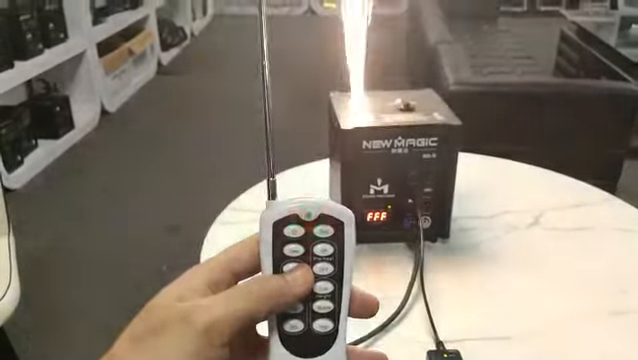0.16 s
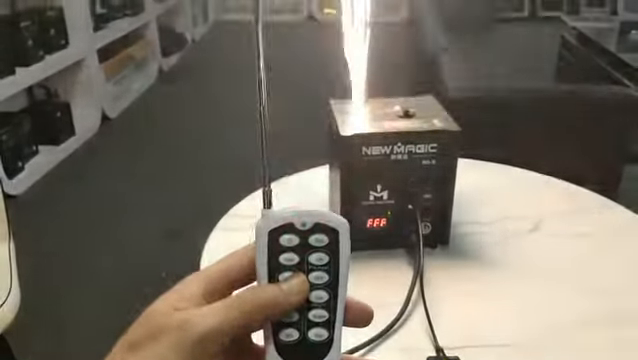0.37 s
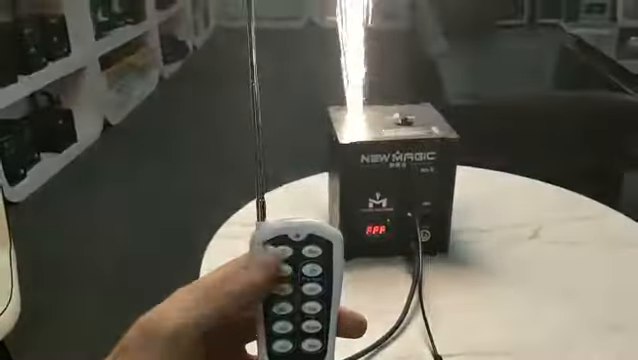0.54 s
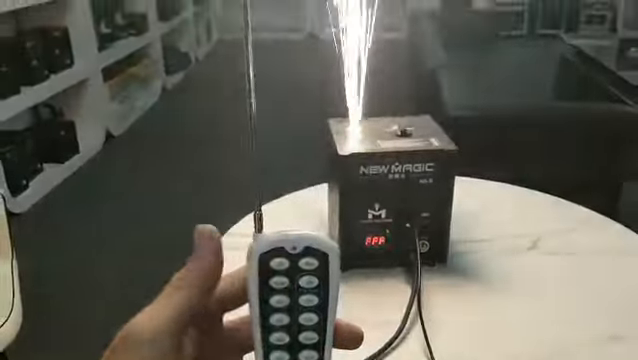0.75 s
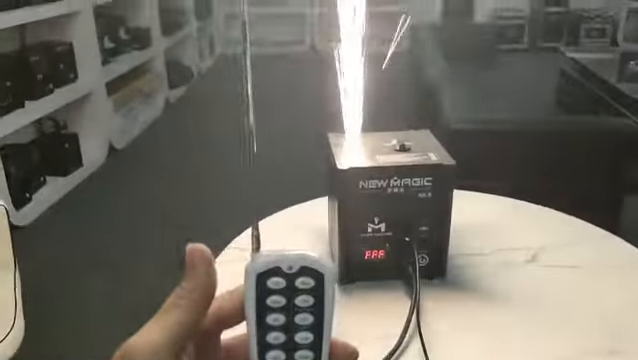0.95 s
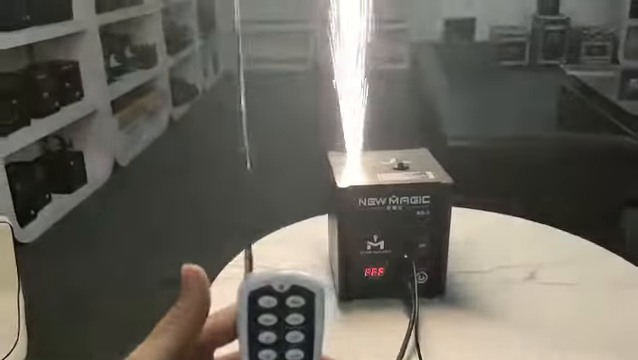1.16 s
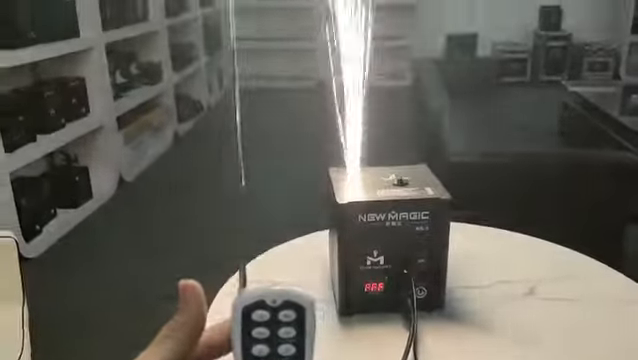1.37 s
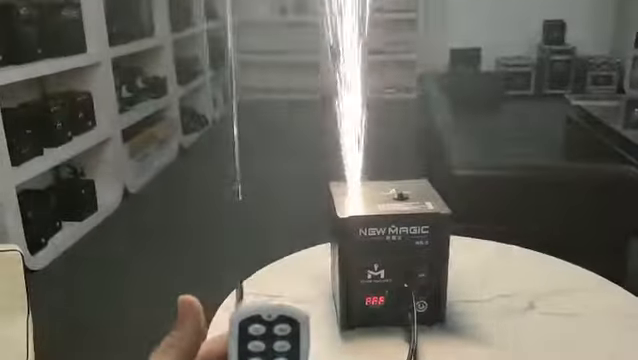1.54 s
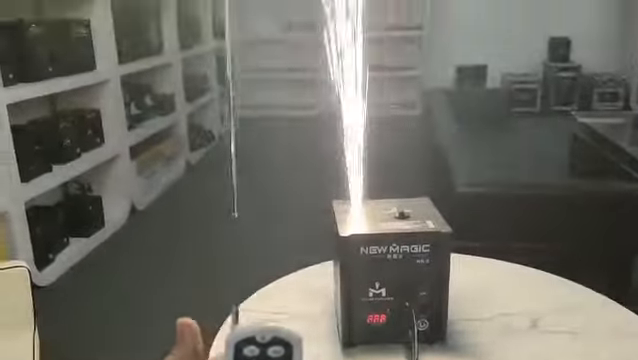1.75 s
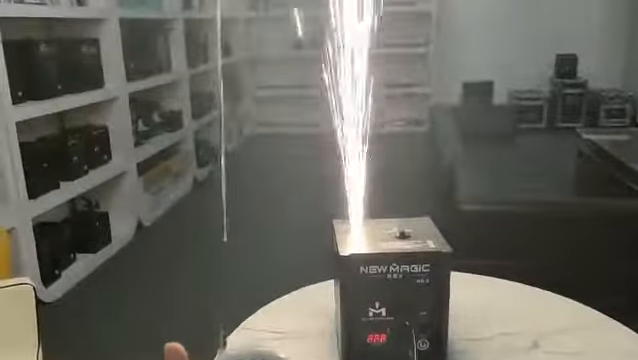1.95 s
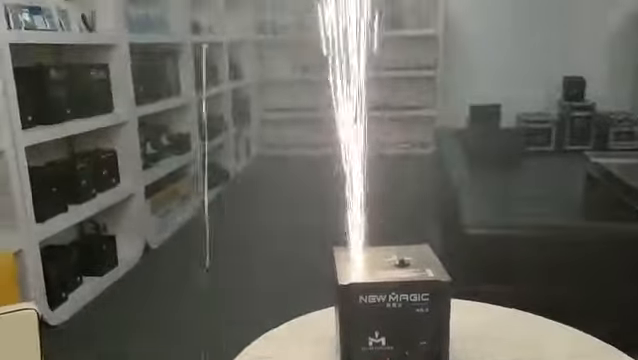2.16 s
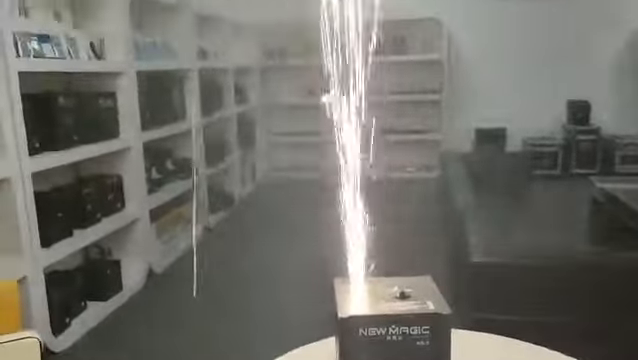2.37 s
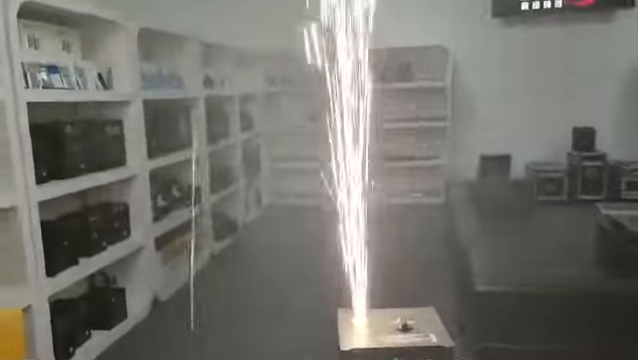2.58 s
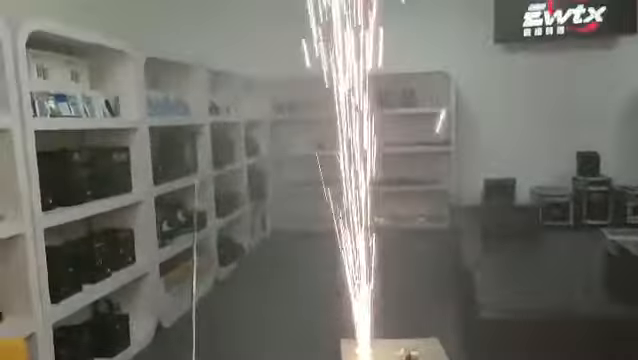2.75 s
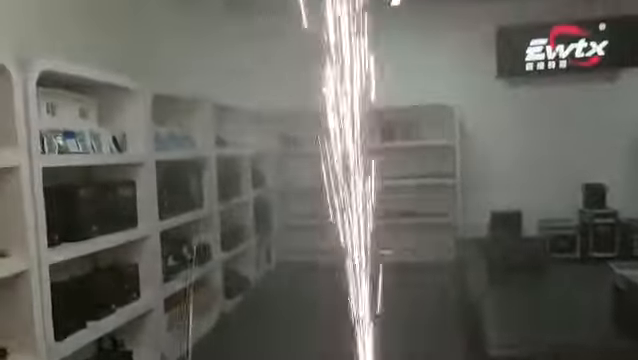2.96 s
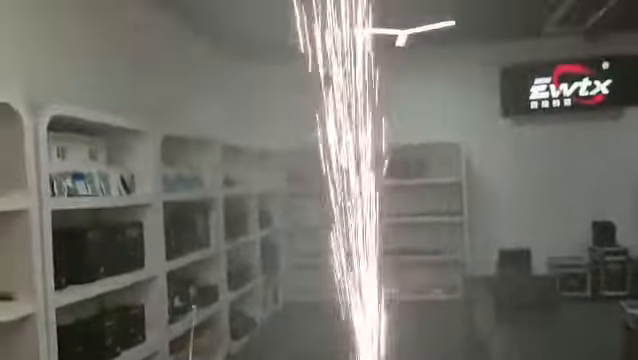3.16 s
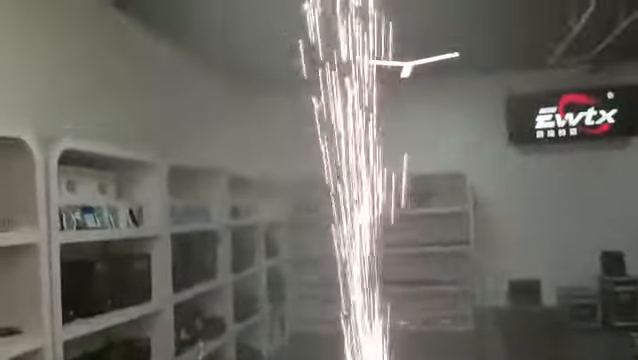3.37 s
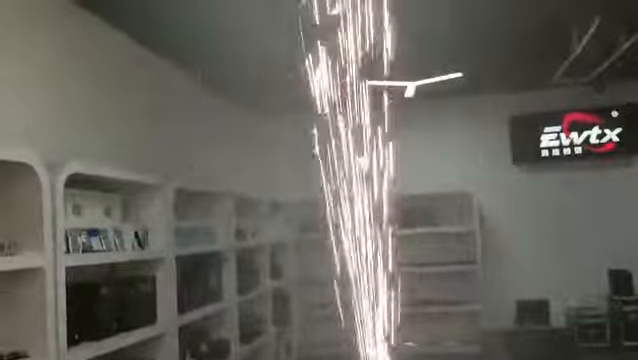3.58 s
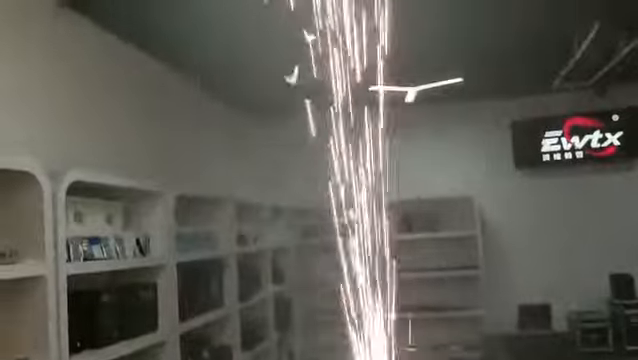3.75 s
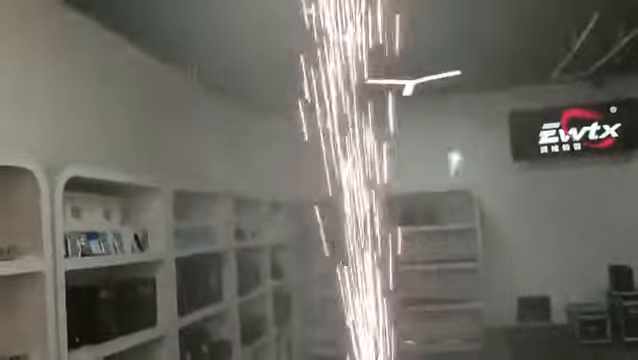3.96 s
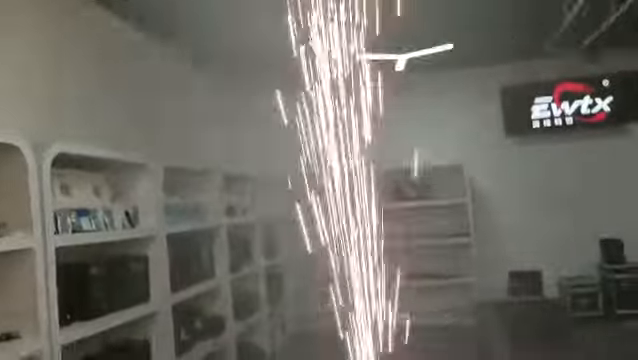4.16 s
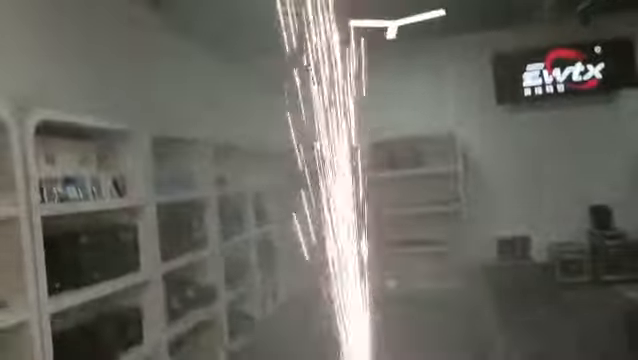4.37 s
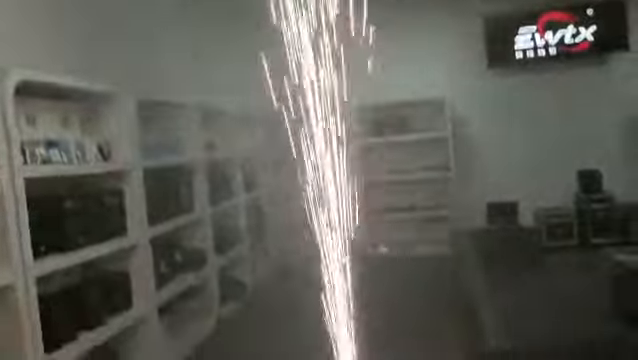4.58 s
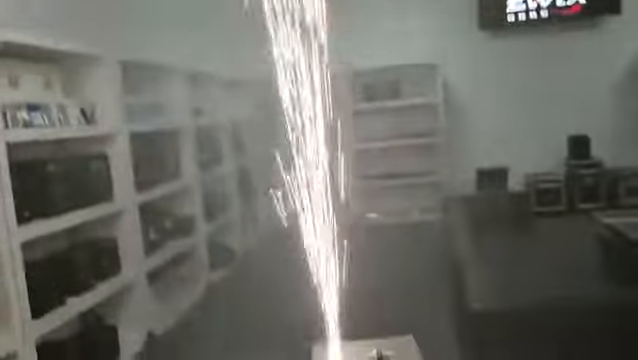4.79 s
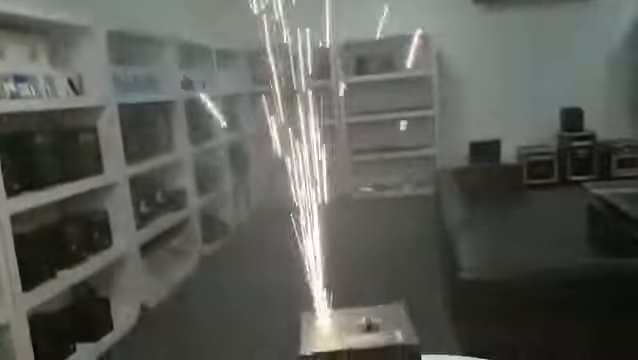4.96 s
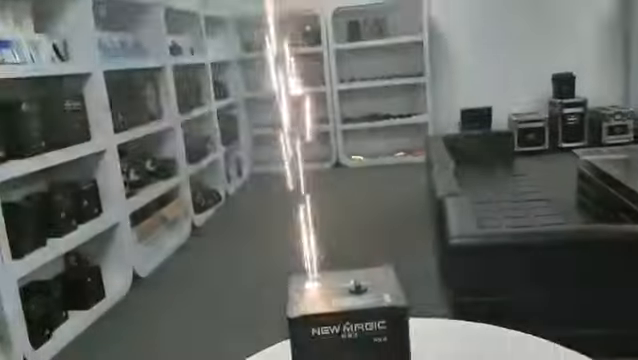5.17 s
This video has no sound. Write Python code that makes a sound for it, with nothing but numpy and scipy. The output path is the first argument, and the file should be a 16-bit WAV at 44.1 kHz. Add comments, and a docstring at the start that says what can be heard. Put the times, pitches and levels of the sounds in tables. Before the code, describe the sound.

A spark fountain machine rushes and hisses over a whining blower, then switches off and dies away with a falling airy whistle.

```python
"""A cold-spark fountain rushes on a showroom table: air roars through its duct and burning powder
fizzes and spits. Its blower hums and whines at multiples of the shaft speed, and air rings the nozzle.
The tones swell and fade as a hand-held phone, about a metre away, rises beside the fountain.
At 4.6 s the blower is switched off, and the rush dies away with a falling airy whistle
over the low rumble of the room."""
import sys
import numpy as np
from scipy import signal
from scipy.fft import rfft, irfft
from scipy.io import wavfile
from scipy.ndimage import map_coordinates

SR = 44100
rng = np.random.default_rng(int(sys.argv[2]) if len(sys.argv) > 2 else 0)


def to_wav(s):
    """Save 16-bit WAV."""
    ch = np.atleast_2d(s).T  # columns
    pcm = np.round(np.clip(ch, -1, 1) * 32767)  # PCM
    wavfile.write(sys.argv[1], SR, pcm.astype(np.int16))


N = 230334
TIME = np.arange(N) / SR
FREQ = np.maximum(np.arange(N // 2 + 1) * SR / N, 1)
SIDES = np.array([[1], [-1]])  # left, right
OFF_S = 4.574  # the blower is switched off
TOP_HZ = 7550  # the phone cuts sound above this


# Bigger lumps of powder flare up. Columns: middle_s, length_s, lift_db
FLARES = [(0.24, 0.025, 3), (0.408, 0.17, 2), (0.843, 0.054, 1), (2.15, 0.051, 2.5), (2.942, 0.089, 2),
          (3.354, 0.11, 1)]

def fountain(sputter_db=0.42, sputter_hz=11):
    """Rushing air roars; burning powder hisses, sputtering and flaring as it is fed unevenly."""
    height = phone_height()
    roar, hiss = np.sqrt(1 - height) * airstream(0) + np.sqrt(height) * airstream(1)
    roar = shimmer(roar, depth=.33, longest_s=.009)
    hiss = flicker(shimmer(hiss, depth=.45, longest_s=.007))
    feed_db = sputter_db * walk(sputter_hz)
    feed_db += sum(db * bump(at_s, length_s) for at_s, length_s, db in FLARES)
    hiss_gain = flow(facing_db=-25, raised_db=-24.5, fall_db_per_s=37.3) * undb(feed_db)
    return lingering(coasting(roar)) + coasting(hiss) * hiss_gain


# The overall tone of the rush. Columns: pitch_hz, relative_level_db
RUSH_COLOUR = [(120, -23), (190, -2), (260, -4), (450, -7), (520, -7), (700, -3), (1020, -3.5), (1450, 0.5),
               (1680, 0), (2300, -3.5), (4100, -2.5), (4900, -5), (6300, -8), (7200, -8.5), (7500, -20)]
# Pitches boosted by the case, duct and nozzle, with the phone facing the case or raised.
# Columns: pitch_hz, width_hz, facing_lift_db, raised_lift_db
DUCT_PEAKS = [(315, 32, 2, 5.5), (354, 130, 2.5, -1), (417, 82, 3.5, 8.5), (704.4, 13, 5, 7.5),
              (752, 28, 4, 0), (859, 65, 4, 1), (1127, 110, 5.5, 6.5), (1202, 35, 0, 3.5), (1335, 55, 3, 7),
              (1650, 21, -4, -1), (2170, 26, 4, 0), (2520, 570, 4, 4.5), (3460, 150, 3.5, 3),
              (3820, 110, 4.5, 2.5), (5130, 120, 1, 0.5)]
# Pitches where echoes off the table and case mostly weaken the rush (below 0 is a dip).
# Columns: pitch_hz, width_hz, facing_lift_db, raised_lift_db
ECHO_DIPS = [(506, 73, -2.5, 2.5), (1003, 73, -0.5, -1), (1480, 51, -3, -2.5), (1655, 65, -5, -3.5),
             (1900, 110, -3.5, -4.5), (2100, 71, -3.5, 1.5), (2333, 97, -4, -6), (4160, 140, -0.5, -1.5),
             (4760, 270, -2.5, 0)]

def airstream(height, split_hz=2100, spark_db=-8):
    """Swirling air in the duct, heard from height 0 or 1: a low roar and a high hiss with sparks in it."""
    lift_db = lift_of(DUCT_PEAKS, height) + lift_of(ECHO_DIPS, height)
    colour = undb(over_freq(RUSH_COLOUR) + lift_db) * reflections() * (FREQ < TOP_HZ)
    treble = 1 / (1 + (split_hz / FREQ) ** 6)
    roar = stereo_noise(height) * colour * np.sqrt(1 - treble)
    hiss = (stereo_noise(height) + undb(spark_db) * sparks()) * colour * np.sqrt(treble)
    return np.array([unit(irfft(roar, N)), unit(irfft(hiss, N))])


def sparks(per_second=2500, spread_db=3):
    """Burning grains make tiny pops of uneven size; gives a left and a right spectrum."""
    lit = rng.random((2, N)) < per_second / SR
    size = undb(spread_db * np.minimum(rng.exponential(size=(2, N)), 4))
    return rfft(unit(lit * size * rng.choice([-1, 1], (2, N))))


def reflections(count=6, strength=.07, shortest_s=.003, longest_s=.011, above_hz=1700):
    """Short echoes off the table, case and shelves colour the treble differently on each side."""
    delays_s = rng.uniform(shortest_s, longest_s, (count, 2, 1))
    echoes = sum(np.exp(-2j * np.pi * FREQ * delay) for delay in delays_s)
    return 1 + strength * echoes * FREQ ** 2 / (FREQ ** 2 + above_hz ** 2)


def shimmer(pair, depth, longest_s, change_hz=12, count=16):
    """The rush has a shifting, watery, metallic sheen."""
    lags = np.linspace(longest_s / count, longest_s, count) * rng.uniform(.9, 1.1, count) * SR
    sheen = sum(walk(change_hz) * np.roll(pair, int(lag), axis=1) for lag in lags)
    return unit(pair + depth * sheen / np.sqrt(count))


def flicker(pair, depth_db=3.5, rate_hz=22):
    """The upper treble flickers band by band."""
    centres_hz = np.linspace(2900, TOP_HZ, 11)
    spectrum = rfft(pair)
    masks = [np.interp(FREQ, centres_hz, row) for row in np.eye(len(centres_hz))]
    steady, *bands = [irfft(spectrum * mask, N) for mask in masks]
    flickering = sum(band * unit(undb(depth_db * np.minimum(walk(rate_hz), 1))) for band in bands)
    return unit(steady + flickering)


def coasting(pair, sag_per_s=0.13):
    """A rush slows down, and so sinks in pitch, once the blower has lost power."""
    place = np.cumsum(1 - sag_per_s * since_off()) - 1
    return np.array([map_coordinates(side, [place], mode="mirror") for side in pair])


def lingering(roar, bass_hz=450, facing_db=-24, raised_db=-23.5):
    """The roar dies away after switch-off; the room holds on to its bass for longer."""
    bass = irfft(rfft(roar) / (1 + (FREQ / bass_hz) ** 10), N)
    upper = (roar - bass) * flow(facing_db, raised_db, fall_db_per_s=28.4)
    return upper + bass * flow(facing_db, raised_db, fall_db_per_s=16.5)


def flow(facing_db, raised_db, fall_db_per_s):
    """Loudness of a rush: held while the blower runs, falling evenly after switch-off."""
    return undb(by_height(facing_db, raised_db) - fall_db_per_s * since_off())


# How fast the blower shaft turns once up to speed. Columns: time_s, speed_hz
SHAFT_SPEED = [(0.3, 224.1), (0.68, 224.7), (0.92, 222.9), (2.05, 222.9), (2.3, 221.4), (2.7, 222.4),
               (3.05, 224.9), (3.8, 225.2), (4.55, 225.1)]
# The tones of the whine, each a multiple of the shaft speed.
# Columns: multiple, facing_level_db, raised_level_db, left_minus_right_db, left_lead_rad
WHINE_TONES = [(3, -45.5, -48, 3.5, 0.5), (4, -34.5, -38.5, -3.5, -0.15), (5, -39.5, -41.5, 1, 3.5),
               (6, -51, -47, -2.5, -2.5), (7, -34, -36.5, 0.5, -1.25), (8, -33.5, -35.5, 3, 1.25),
               (9, -36.5, -37.5, 5, -1.2), (10, -38, -39.5, 11, -0.1), (11, -44.5, -44, 2.5, 3),
               (12, -42.5, -41, 10, 0.5), (16, -60, -45, 4.5, -3), (20, -45, -42, 5.5, -0.1)]

def blower(wobble=0.00063, wobble_hz=20, waver_db=1, waver_hz=13):
    """The unbalanced fan hums once a turn; its blades whine higher up until the power is cut."""
    start_short_hz, start_short_db, settle_s = 5.9, 8, .13  # it is still coming up to speed
    hum_hold_s, hum_fade_s, whine_fade_s = .022, .026, .12  # after switch-off
    starting = np.exp(-TIME / settle_s)
    shaft_hz = (curves(SHAFT_SPEED)[0] - start_short_hz * starting) * (1 + wobble * walk(wobble_hz))
    phase = 2 * np.pi * np.cumsum(shaft_hz) / SR
    hum_db = by_height(-27, -32) + standing_waves(multiple=1)[0]
    hum = unit(np.sin(phase)) * undb(hum_db)
    whine = 0
    for multiple, facing_db, raised_db, pan_db, lead_rad in WHINE_TONES:
        lift_db, left_db = standing_waves(multiple)
        level_db = by_height(facing_db, raised_db) + lift_db + waver_db * walk(waver_hz)
        whine += whine_tone(phase, multiple, pan_db + left_db, lead_rad) * undb(level_db)
    hum *= np.exp(-np.maximum(since_off() - hum_hold_s, 0) / hum_fade_s)
    whine *= np.exp(-since_off() / whine_fade_s)
    return (hum + whine) * undb(-start_short_db * starting)


def whine_tone(phase, multiple, pan_db, lead_rad, flutter_hz=16):
    """One blade tone: echoes toss it between the moving microphones and swirling air shakes it."""
    # higher tones are scattered more and change faster as the phone moves
    scatter, drift_hz = multiple / 60, 1.2 * np.sqrt(multiple)
    path = (1 + scatter * swirl(drift_hz)) * undb(SIDES * pan_db / 2)
    path /= np.sqrt(np.mean(np.abs(path) ** 2, axis=0))  # what one side loses, the other gains
    side_phase = SIDES * (lead_rad + by_height(0.18, 1) * walk(4.6)) / 2
    tone = np.exp(1j * (multiple * phase + 2 * np.pi * rng.random() + side_phase))
    flutter = 1 + (.08 + multiple / 90) * swirl(flutter_hz)
    return unit(np.real(path * flutter * tone))


# Moments when one blower tone swells or fades.
# Columns: middle_s, multiple, length_s, lift_db, shift_left_db
TONE_SWELLS = [(.04, 7, .12, 6, 0), (.08, 1, .1, -4.5, 0), (.12, 3, .25, 13, 0), (0.167, 8, .27, 8, 5),
               (.25, 4, 0.22, 3.5, 2.5), (.3, 7, .33, 11, -2), (0.404, 10, 0.44, -14, -7.5),
               (0.45, 20, 0.24, 11, 2), (0.444, 9, 0.2, 5.5, 9), (0.524, 1, 0.71, 2, 0),
               (.6, 4, .25, -3.5, 3), (.66, 7, .14, 3, -3.5), (.85, 7, .15, 10, -1.5),
               (.91, 10, .14, 4, -4), (.95, 20, .24, 13, 1.5), (.96, 8, .1, 4, 0),
               (1.076, 7, .27, 0.5, -18), (1.16, 10, 0.44, 6, -8), (1.16, 20, .12, 6, 0),
               (1.2, 9, .25, 4.5, 7), (1.34, 8, 0.23, -1.5, -19), (1.53, 20, 0.17, 8.5, 2),
               (1.68, 8, .8, 7, -5.5), (1.65, 9, .27, 5, 5), (1.83, 20, .12, 6, -2),
               (2.08, 20, 0.14, 11.5, 5.5), (2.14, 8, 0.4, 5, -2.5), (2.3, 5, 0.68, 3.5, 13),
               (2.33, 20, .22, -4, 0), (2.38, 1, 0.6, -4.5, 0), (2.48, 10, 0.2, 7, 4.5),
               (2.66, 8, 0.11, -13, -13), (2.8, 20, 0.15, 5, -0.5), (2.83, 8, 0.12, 5, 3.5),
               (3.07, 7, .25, 6, 2), (3.253, 5, .45, 6.5, -10.5), (3.78, 8, 0.2, 6.5, 3.5),
               (4.13, 9, .2, -10, 6), (4.12, 7, 0.3, 4, 7), (4.25, 20, .3, 3, -7), (4.45, 8, .3, 1, -16),
               (4.485, 1, 1, 4, 0), (4.52, 7, .2, -4, 0)]

def standing_waves(multiple):
    """Echoes give a tone loud and quiet spots; drifting through them changes its level and side."""
    lift_db, left_db = np.zeros((2, N))
    for at_s, tone_multiple, length_s, lift, left in TONE_SWELLS:
        if tone_multiple == multiple:
            swell = bump(at_s, length_s)
            lift_db += lift * swell
            left_db += left * swell
    return lift_db, left_db


# The hollow note of the nozzle, before its fade at switch-off. Columns: time_s, pitch_hz, level_db
NOZZLE_NOTE = [(0, 1254, -35), (.35, 1302, -32.5), (.8, 1278, -35), (1.3, 1273, -33), (2.2, 1256, -37.5),
               (2.85, 1239, -33.5), (3.3, 1285, -35.5), (3.9, 1266, -40.5), (4.1, 1266, -28.5),
               (4.32, 1272, -33.5), (4.45, 1205, -31.5), (4.6, 1217, -27.5)]

def nozzle(fall_db_per_s=58):
    """The air jet rings the nozzle with a hollow note that drifts, surges and fades after switch-off."""
    hz, level_db = curves(NOZZLE_NOTE)
    hollow = coasting(ringing(hz, width_hz=50, side_db=-13.5))
    return hollow * undb(level_db - fall_db_per_s * since_off())


# The downward slide of the whistle. Columns: time_s, pitch_hz, level_db
WHISTLE_SLIDE = [(4.45, 3570, -76), (4.57, 3260, -47), (4.68, 3180, -43), (4.8, 3020, -33.5),
                 (4.87, 2885, -35), (4.95, 2790, -45), (5.22, 2670, -65)]

def dying_whistle():
    """An airy whistle slides down as the jet dies."""
    hz, level_db = curves(WHISTLE_SLIDE)
    return ringing(hz, width_hz=200, side_db=3) * undb(level_db)


# Moments when the jet spits. Columns: middle_s, length_s, level_db
JET_SPITS = [(0.234, 0.018, -30), (1.43, 0.021, -42), (2.25, .025, -41)]

def spits(low_hz=4500):
    """Burning grains crackle in short, bright spurts."""
    pops = sparks(per_second=610, spread_db=-1)
    crackle = unit(irfft(pops * (FREQ > low_hz) * (FREQ < TOP_HZ), N))
    return crackle * sum(undb(db) * bump(at_s, length_s) for at_s, length_s, db in JET_SPITS)


# The steady noise of the room and the idling machine. Columns: pitch_hz, relative_level_db
ROOM_COLOUR = [(10, -9), (22, 4.5), (30, -14.5), (42, -14.5), (62, -0.5), (80, -3.5), (125, -6),
               (200, -8.5), (300, -2.5), (420, -12.5), (1500, -32.5), (2400, -24), (2830, -20), (3400, -44),
               (7500, -25)]
# How loud the deep rumble of the room is. Columns: time_s, level_db
ROOM_RUMBLE = [(0, -35), (2.2, -42.5), (2.9, -45.5), (3.8, -39), (4.4, -38), (5.22, -43)]
# Low drones in the room. Columns: pitch_hz, level_db
ROOM_DRONES = [(48.5, -52), (62, -55), (99.5, -55)]

def room(rush_db=-38.5, rumble_hz=34.8, rumble_width_hz=6, unrest=0.55, waver=0.93, side_db=-24):
    """The room adds a steady rush, a restless deep rumble and a few wavering drones."""
    rush = unit(irfft(stereo_noise(1) * undb(over_freq(ROOM_COLOUR)), N)) * undb(rush_db)
    shared, apart = swirl(rumble_width_hz)
    sway = 1 + unrest * shared + SIDES * undb(side_db) * apart
    rumble = unit(np.real(sway * np.exp(2j * np.pi * rumble_hz * TIME)))
    drones = 0
    for hz, db in ROOM_DRONES:
        swell = 1 + waver * walk(1.7)
        drones += undb(db) * unit(swell * np.sin(2 * np.pi * hz * TIME + walk(3.5)))
    return rush + rumble * undb(curves(ROOM_RUMBLE)[0]) + drones


# How alike the two microphones hear a noise (1 = the same, 0 = unrelated, -1 = opposite).
# Columns: pitch_hz, facing_likeness, raised_likeness, left_minus_right_db
MICROPHONES = [(60, .97, .97, 0), (230, .995, .995, 0), (370, .975, .975, 0), (450, .86, .86, .4),
               (530, .62, .6, 0), (700, .76, .3, -1), (930, .7, .36, -.7), (1060, -.08, .16, .6),
               (1350, .18, .27, 2), (1750, -.05, -.2, 2), (2500, .17, .17, 4.5), (3150, .05, .22, 3),
               (3600, -.58, .47, .8), (4200, -.28, .08, 2), (6000, -.1, -.06, 1.4)]

def stereo_noise(height):
    """Noise spectra at the two microphones: alike in the bass, nearly unrelated in the treble."""
    hz, facing, raised, pan_db = np.transpose(MICROPHONES)
    alike = over_freq(np.c_[hz, raised if height else facing])
    mid, side = rfft(rng.standard_normal((2, N)))
    pair = mid * np.sqrt((1 + alike) / 2) + SIDES * side * np.sqrt((1 - alike) / 2)
    return pair * undb(SIDES * over_freq(np.c_[hz, pan_db]) / 2)


# How the hand moves the phone. Columns: time_s, height (0 to 1)
PHONE_PATH = [(0, 0.016), (1.6, 0.076), (2.4, 0.55), (3.2, 1), (4.3, 0.88), (5.2, 0.12)]

def phone_height():
    """Where the phone is: 0 is facing the case, 1 is raised beside the fountain."""
    return np.clip(curves(PHONE_PATH)[0], 0, 1)


def by_height(facing, raised):
    """Move from one value to the other as the phone rises."""
    return facing + (raised - facing) * phone_height()


def since_off():
    """Seconds since the blower was switched off."""
    return np.maximum(TIME - OFF_S, 0)


def ringing(hz, width_hz, side_db):
    """A breathy note: a narrow band of noise around a moving pitch."""
    shared, apart = swirl(width_hz)
    tone = np.exp(2j * np.pi * np.cumsum(hz) / SR)
    return unit(np.real((shared + SIDES * undb(side_db) * apart) * tone))


def lift_of(table, height):
    """Peaks or dips in dB across the pitches, as heard from height 0 or 1."""
    return sum(lifts[height] / (1 + (2 * (FREQ - hz) / width) ** 2) for hz, width, *lifts in table)


def walk(rate_hz):
    """A smooth random wander of typical size 1, changing about `rate_hz` times a second."""
    steps = rng.standard_normal(2048)
    hz = np.arange(len(steps) // 2 + 1) * SR / N
    slow = irfft(rfft(steps) * np.exp(-(hz / rate_hz) ** 2) * (hz > 0))
    return np.interp(TIME, np.linspace(0, N / SR, len(slow)), unit(slow))


def swirl(rate_hz):
    """Two separate smooth random changes of size and phase."""
    return np.array([unit(walk(rate_hz) + 1j * walk(rate_hz)) for _ in range(2)])


def bump(at_s, length_s):
    """A smooth rise to 1 and back, `length_s` wide at half height."""
    return 0.5 ** ((2 * (TIME - at_s) / length_s) ** 2)


def curves(table):
    """Join the rows of a time table into one curve for each value column."""
    times_s, *columns = np.transpose(table)
    return [np.interp(TIME, times_s, column) for column in columns]


def over_freq(points):
    """Join (pitch_hz, value) points into a curve, giving each octave equal room."""
    hz, value = np.transpose(points)
    return np.interp(np.log(FREQ), np.log(hz), value)


def undb(db):
    """Turn decibels into a number to multiply by."""
    return 10 ** (np.asarray(db) / 20)


def unit(x):
    """Scale to an average strength (rms) of 1."""
    return x / np.sqrt(np.mean(np.abs(x) ** 2))


def scene():
    """The spark machine and the room together."""
    return fountain() + blower() + nozzle() + dying_whistle() + spits() + room()


def record(dry):
    """The phone cuts the treble steeply."""
    return signal.sosfiltfilt(signal.ellip(12, .05, 60, TOP_HZ, fs=SR, output="sos"), dry)


dry = scene()
out = record(dry)
to_wav(out)
```